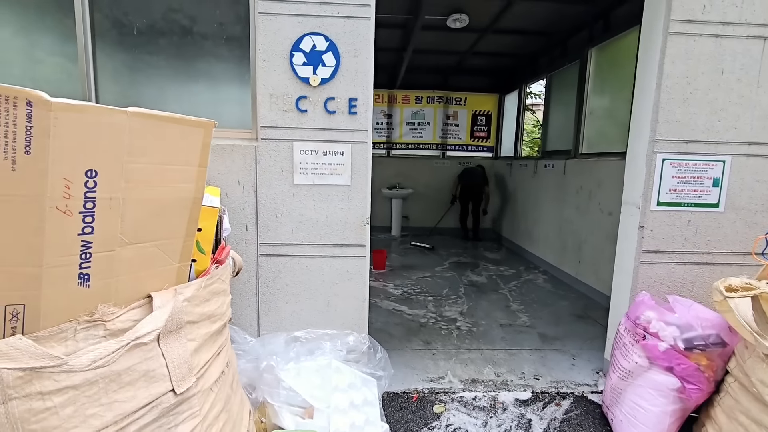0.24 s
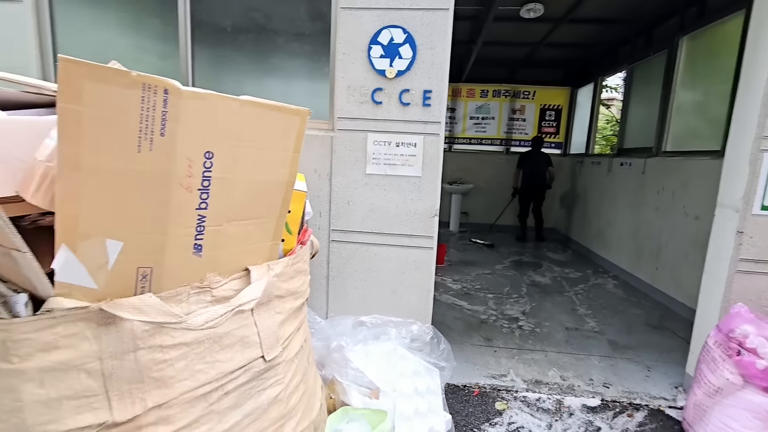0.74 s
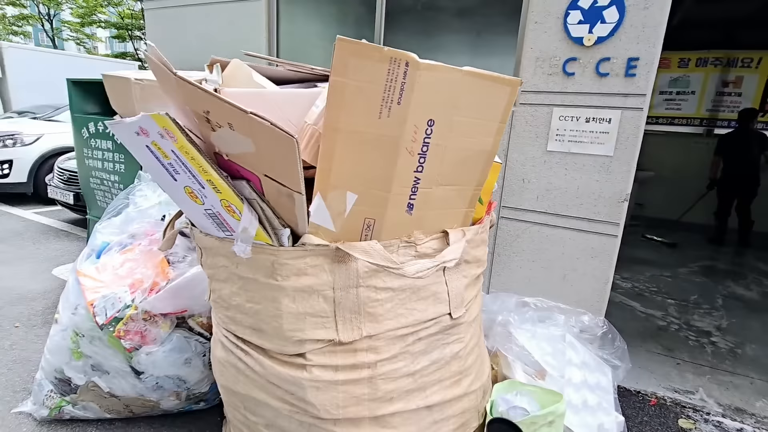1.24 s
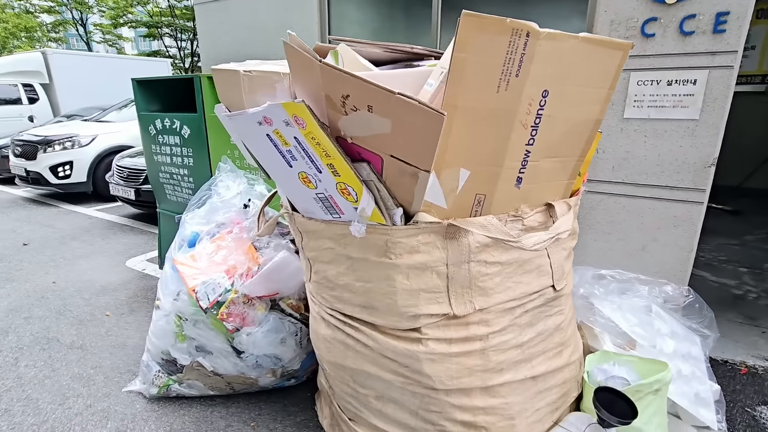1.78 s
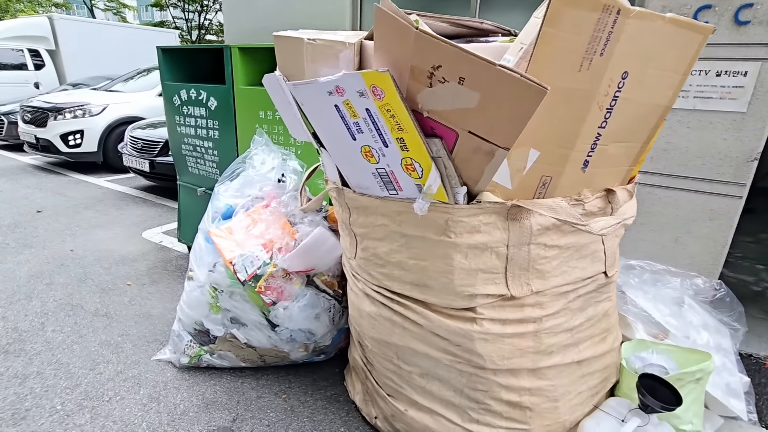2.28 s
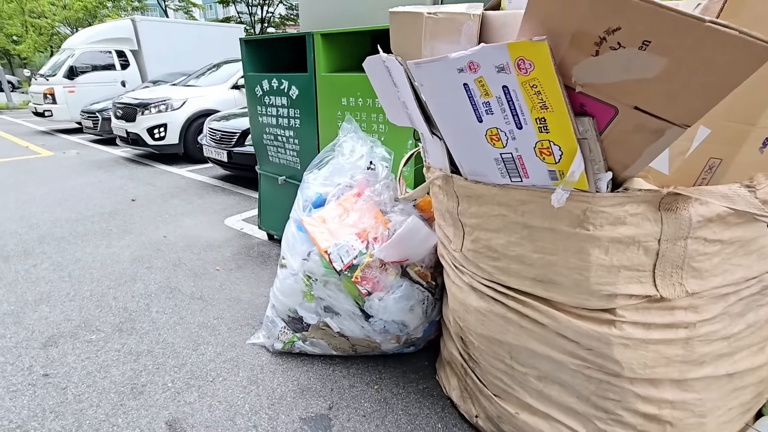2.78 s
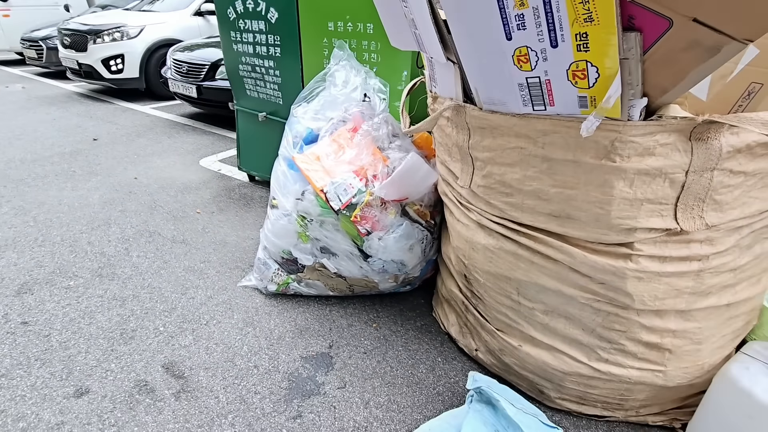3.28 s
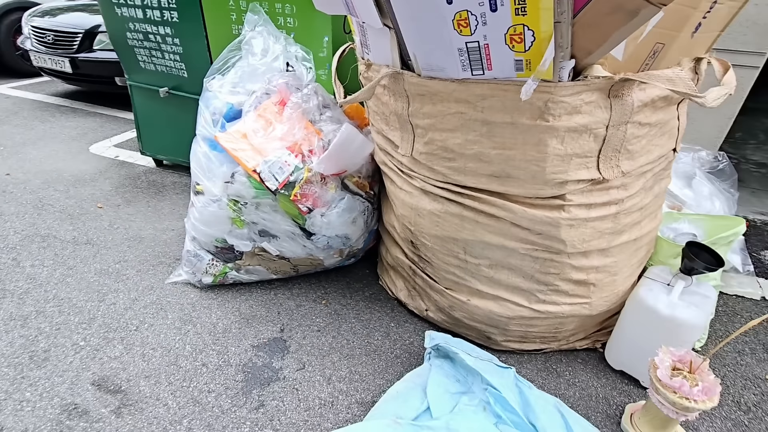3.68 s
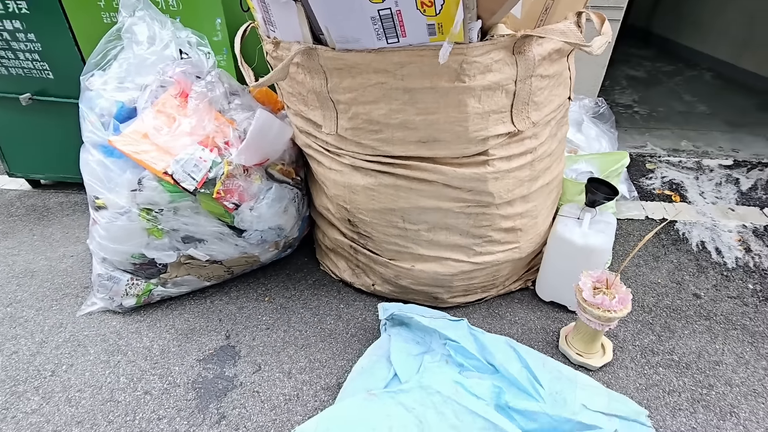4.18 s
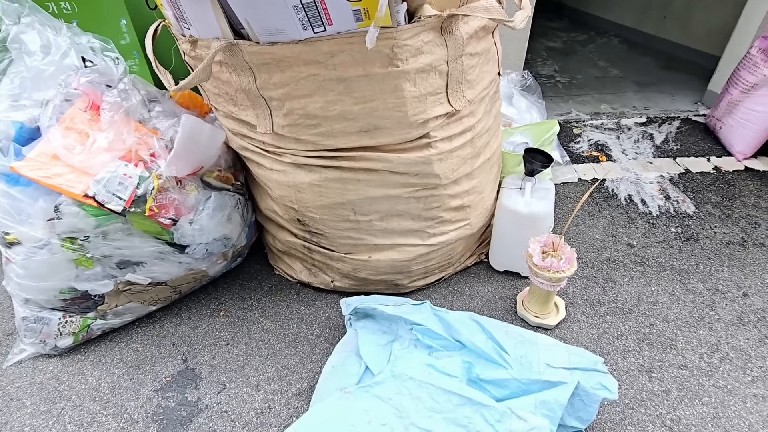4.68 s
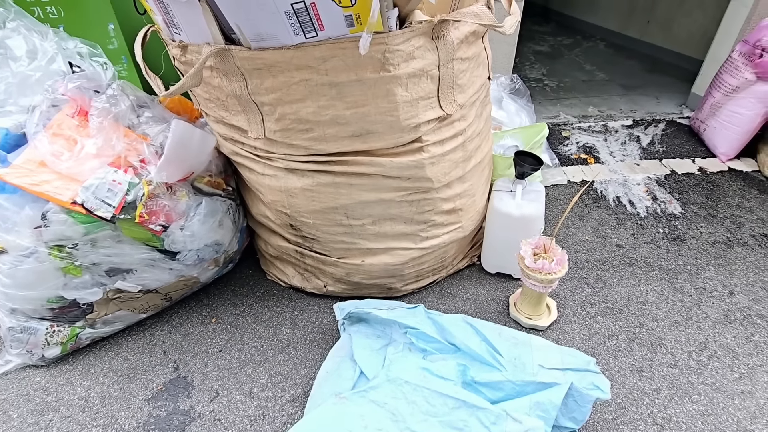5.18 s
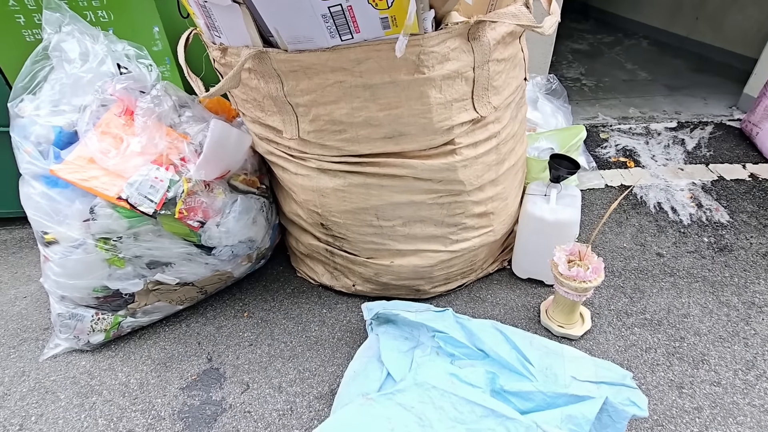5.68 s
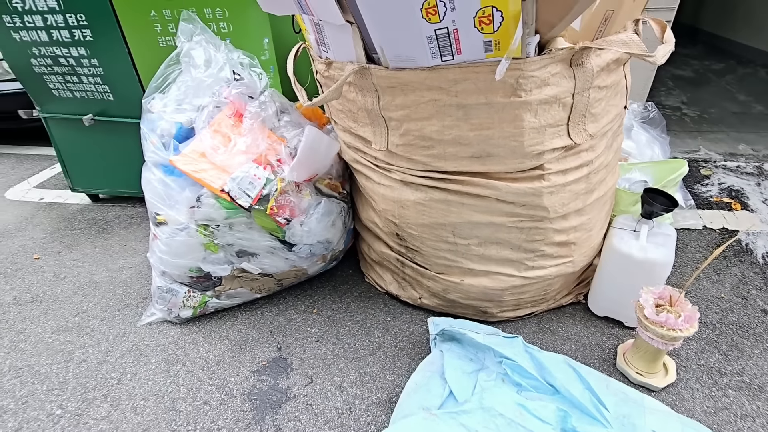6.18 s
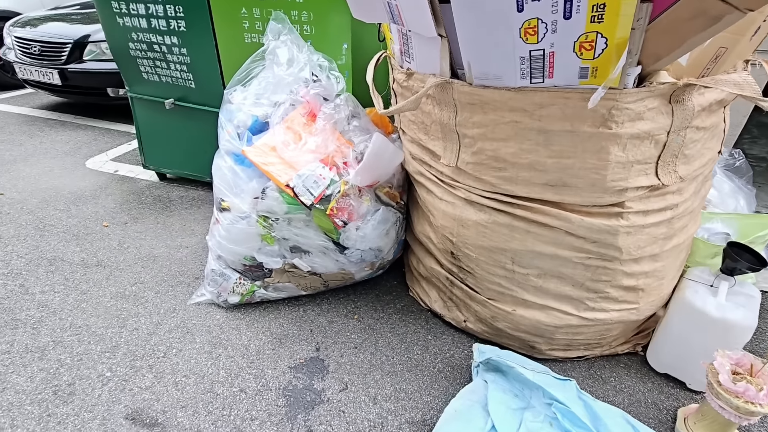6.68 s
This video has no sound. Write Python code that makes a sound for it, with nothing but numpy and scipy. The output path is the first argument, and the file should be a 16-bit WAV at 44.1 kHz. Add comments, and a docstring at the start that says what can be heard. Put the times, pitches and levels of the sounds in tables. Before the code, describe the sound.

A stiff brush scrubs wet concrete back and forth in an echoing shed, over distant traffic rumble and a ventilation drone.

```python
"""In a hard-walled shed a stiff brush scrubs wet concrete to and fro, while a clatter dies away.
Friction snaps the bristles free, thousands a second, as hiss and rasp; the walls add reverberation.
Outside, distant traffic and ventilation rumble over a car park as a diffuse field.
Someone holding the microphone shifts about, with a few soft scuffs and ticks and one low bump."""
import sys
import numpy as np
from scipy import signal
from scipy.fft import rfft, irfft, next_fast_len
from scipy.io import wavfile
from scipy.ndimage import uniform_filter1d, map_coordinates

SR = 44100
rng = np.random.default_rng(int(sys.argv[2]) if len(sys.argv) > 2 else 0)


def wav_record(signal):
    """Record a signal, one row per channel, as 16-bit PCM in the file named by sys.argv[1]."""
    frames = np.transpose(np.atleast_2d(signal))
    bounded = np.clip(frames, -1, 1)
    # unit amplitude maps onto the largest positive 16-bit level
    quanta = np.round(bounded * 32767).astype(np.int16)
    wavfile.write(sys.argv[1], SR, quanta)


N = 305965


def amp(db):
    """Amplitude grows tenfold for every 20 dB."""
    return 10 ** (np.asarray(db) / 20)


def unit(x):
    """Normalisation to rms 1."""
    return x / np.sqrt(np.mean(x ** 2) + 1e-20)


def along(points, hz):
    """Interpolation of (f/Hz, value) points on a logarithmic frequency axis."""
    f, values = np.transpose(points)
    return np.interp(np.log(hz + 1), np.log(f + 1), values)


def curves(rows):
    """Linear interpolation of (t/s, values...) rows: one envelope for each value column."""
    times, *columns = np.transpose(rows)
    return [np.interp(np.arange(N) / SR, times, column) for column in columns]


def wobble(rate):
    """Random modulation: a smooth curve through rate knots a second."""
    return map_coordinates(rng.standard_normal(int(N * rate / SR) + 4), [np.arange(N) * rate / SR])


def filtered(x, response):
    """Linear filtering: the spectrum is multiplied by a frequency response."""
    size = next_fast_len(N + SR // 2)
    return irfft(rfft(x, size) * response(np.fft.rfftfreq(size, 1 / SR)), size)[..., :N]


def add(track, start_s, sound):
    """Superposition: a sound adds to the track from start_s on."""
    part = track[..., max(round(start_s * SR), 0):][..., :sound.shape[-1]]
    part += sound[..., :part.shape[-1]]


def panned(db):
    """Intensity stereo: two gains for a left-minus-right level difference."""
    return amp(np.array([db, -db]) / 2)


def diffuse(pair, spectrum, left_lag_s=0.00036):
    """A diffuse field is less coherent between spaced microphones as frequency rises; rms 1."""
    # left-right likeness: f/Hz, coherence
    coherence = [(30, 0.86), (90, 0.98), (250, 0.85), (450, 0.66), (720, 0.31), (1400, 0.41), (2400, 0.28),
                 (3600, 0.072), (6000, 0.03)]
    angle = lambda hz: np.arccos(np.clip(along(coherence, hz), -1, 1)) / 2
    mid, side = filtered(pair, lambda hz: amp(along(spectrum, hz)) * [np.cos(angle(hz)), np.sin(angle(hz))])
    # most of the sound reaches the right side first
    delay = lambda hz: np.exp(np.outer([-1j, 1j], np.pi * hz * left_lag_s))
    return unit(filtered(np.array([mid + side, mid - side]), delay))


def stroke_levels(skew=0.91, hiss_power=1.424, rest_db=-75):
    """Friction noise follows a power of speed, one arch a stroke; gives hiss and rasp levels in dB."""
    # overlapping pushes and pulls: start t/s, length t/s, hiss level/dB, relative rasp level/dB
    strokes = [(-.012, .355, -51, -21), (.255, .335, -53.5, -9.5), (0.529, 0.36, -49, -13.5),
               (.802, 0.36, -50.5, -11.5), (1.096, .455, -48, -9.5), (1.464, 0.45, -48.5, -16),
               (1.857, 0.46, -45.5, -15), (2.23, 0.5, -47, -15), (2.673, .482, -44, -19),
               (3.067, .53, -46.5, -16), (3.53, .556, -43.5, -13.5), (3.995, 0.53, -43.5, -14.5),
               (4.442, 0.51, -43, -12), (4.861, 0.5, -44.2, -13.5), (5.308, 0.48, -42.5, -10),
               (5.695, 0.48, -47.5, -9), (5.96, 0.34, -58.5, -8), (6.22, 0.58, -67, -9),
               (6.768, 0.22, -57, -13)]
    t = np.arange(N) / SR
    hiss, rasp = np.full((2, N), amp(rest_db) ** 2)
    for start, length, hiss_db, rasp_db in strokes:
        progress = np.clip((t - start) / length, 0, 1)
        speed = np.abs(np.sin(np.pi * progress ** skew))  # fastest just before the middle
        power = (amp(hiss_db) * speed ** hiss_power) ** 2
        hiss += power
        rasp += power * amp(rasp_db) ** 2
    return 10 * np.log10(hiss), 10 * np.log10(rasp)


def flicks(per_second, spread_db=1.0):
    """Shot noise: bristle tips snap free at random moments and with uneven force."""
    snaps = rng.random((2, N)) < per_second / SR
    forces = rng.standard_normal((2, N)) * amp(spread_db * rng.standard_normal((2, N)))
    return unit(snaps * forces / np.sqrt(per_second))


def splay(pair, depth_db):
    """Spectral modulation: the bristles splay differently from moment to moment, so their colour wanders."""
    spectra = signal.stft(pair, nperseg=512)[2]
    patches = rng.standard_normal(spectra.shape[1:])
    patches = uniform_filter1d(patches, size=9, axis=0)  # across frequency
    patches = uniform_filter1d(patches, size=36, axis=1)  # across time
    return signal.istft(spectra * amp(depth_db * unit(patches)), nperseg=512)[1][:, :N]


def shed(x, wet_db):
    """Reverberation: the shed's hard walls give a smooth, diffuse echo; the treble dies first."""
    # reverberation time: f/Hz, 60 dB decay t/s
    t60 = [(300, 1.15), (3000, 0.82), (7000, 0.75), (15000, 0.13)]
    echo, hop = np.zeros((2, N)), SR // 4
    for start in range(0, N, hop):  # a fresh tail each quarter second keeps the echo free of tones
        hz, t, noise = signal.stft(rng.standard_normal((2, SR // 2)), SR, nperseg=256)
        tail = signal.istft(noise * amp(-60 * t / along(t60, hz)[:, None]), SR, nperseg=256)[1]
        tail /= np.linalg.norm(tail[0])
        add(echo, start / SR, signal.fftconvolve(x[:, start:start + hop], tail, axes=1))
    return x + amp(wet_db) * echo


def brush():
    """Stick-slip friction: faster strokes flick more bristles and spray; tufts catch on grit and rasp."""
    # spectra of bristles on wet concrete, fine spray and catching tufts: f/Hz, level/dB
    hiss_spectrum = [(1200, -17), (2700, -6), (3600, -2.5), (5300, 0.5), (7800, -0.5), (9200, -1),
                     (10300, -6.5), (11500, -8.5), (15300, -5)]
    spray_spectrum = [(1000, -90), (5000, -26), (9000, -4), (10300, -3), (11000, -7), (12000, -2),
                      (13200, -6), (15300, -2.5)]
    rasp_spectrum = [(400, -21), (900, -12), (1500, 0), (1900, -12.5), (2600, -8), (3150, 4), (4200, 3.5),
                     (6500, -6.5), (12000, -14)]
    # direction of the brush as the listener turns: t/s, left-minus-right level/dB
    bearing = [(0, 2.5), (1.3, -1.5), (2.9, -4), (4.4, -1), (6.94, -1.5)]
    pan_db, = curves(bearing)
    hiss_db, rasp_db = stroke_levels()
    activity_db = (hiss_db - hiss_db.max()) / 2
    activity, catch = amp(activity_db), wobble(70)
    hiss = amp(hiss_db + 0.37 * catch) * diffuse(flicks(24000 * activity), hiss_spectrum)
    spray_db = hiss_db + 1 + 0.12 * activity_db + 0.26 * catch
    spray = amp(spray_db) * diffuse(flicks(24000 * activity), spray_spectrum)
    rasp = amp(rasp_db + 3 + 1.3 * catch) * diffuse(flicks(3000 * activity), rasp_spectrum)
    direct = (hiss + spray) * panned(pan_db) + rasp
    return shed(splay(direct, depth_db=0.9), wet_db=-6)


def clatter(t60):
    """Resonance: hard knocks ring on between the walls and decay exponentially."""
    # knocks deep in the shed, heard as their echo: t/s, level/dB, rise t/s
    knocks = [(0, -42, 0.00046), (.57, -49.5, 0.034)]
    # their resonances: centre f/Hz, width f/Hz, level/dB
    modes = [(678, 42, 4), (900, 290, -3.5), (1320, 210, -1.5), (1580, 270, -3.5), (2220, 310, -7.5),
             (2960, 210, -6), (3420, 340, -8.5), (4770, 3100, -16.5)]
    t, envelope = np.arange(N) / SR, np.zeros(N)
    for start, db, rise in knocks:
        add(envelope, start, amp(db - 60 * t / t60) * (1 - np.exp(-t / rise)))
    body = lambda f: sum((-1) ** k * amp(db) * 1j * f * width / (hz * hz - f * f + 1j * f * width)
                         for k, (hz, width, db) in enumerate(modes))
    return envelope * unit(filtered(rng.standard_normal((2, N)), body))


def rush(spectrum):
    """Many incoherent sources sum to diffuse Gaussian noise; rms 1."""
    return diffuse(rng.standard_normal((2, N)), spectrum)


def town():
    """Diffuse background noise: traffic rumble, a hollow ventilation drone and a haze of far tyres."""
    # spectra of traffic, ventilation and tyres: f/Hz, level/dB
    rumble_spectrum = [(12, -32), (25, -7), (42, -3), (80, -1), (150, 0), (200, -2), (320, -28.5),
                       (700, -64), (2000, -120)]
    drone_spectrum = [(20, -60), (90, -42), (160, -7), (185, -0.5), (208, 0), (235, -0.5), (275, -4.5),
                      (330, -16.5), (500, -33), (1500, -120)]
    haze_spectrum = [(30, -47), (150, -23.5), (280, -1), (380, 0.5), (500, -7), (700, -13), (1000, -19.5),
                     (1500, -22.5), (2200, -26), (4500, -32.5), (9600, -36.5), (10700, -40), (15000, -45)]
    # the traffic slowly grows: t/s, relative rumble level/dB, relative haze level/dB
    traffic = [(0, -48, -49.5), (1.6, -47.5, -46.5), (2.7, -47, -47.5), (3.6, -42.5, -46.5),
               (4.9, -47.5, -47.5), (5.5, -46.5, -45), (6.2, -43.8, -47.5), (6.94, -43, -49)]
    # the drone swells and sinks: t/s, level/dB
    ventilation = [(0, -43.5), (.8, -43), (1.65, -36), (2.1, -40), (2.6, -40.5), (3.35, -37), (4.1, -37.5),
                   (5.0, -42), (5.4, -36), (5.85, -42.5), (6.25, -38.5), (6.94, -38.5)]
    rumble_db, haze_db = curves(traffic)
    drone_db, = curves(ventilation)
    rumble = amp(rumble_db + 3 + 0.55 * wobble(5)) * rush(rumble_spectrum)
    drone = amp(drone_db + 0.97 * wobble(8)) * rush(drone_spectrum)
    haze = amp(haze_db + 3 + 0.63 * wobble(10)) * rush(haze_spectrum)
    return rumble + drone + haze


def scuffs(t60, drag_db, drag_t60, attack_s):
    """Impact, then sliding friction: grit ticks under a sole and a weaker drag follows."""
    # shoes on asphalt: t/s, level/dB, pitch of the noise band f/Hz
    steps = [(1.44, -38, 700), (3.986, -44, 1300), (4.011, -41, 1150), (4.164, -35, 840),
             (4.204, -36, 1100), (4.229, -39, 900), (6.126, -37, 1300), (6.582, -50.5, 3000),
             (6.828, -42.5, 2300)]
    out, t = np.zeros((2, N)), np.arange(SR // 5) / SR
    tick, drag = amp(-60 * t / t60), amp(drag_db - 60 * t / drag_t60)
    envelope = (tick + drag) * (1 - np.exp(-t / attack_s))
    for start, db, hz in steps:
        band = signal.butter(2, [hz * 0.33, min(hz * 1.16, SR / 3)], "bandpass", fs=SR)
        grit = unit(signal.lfilter(*band, rng.standard_normal((2, len(t)))))
        add(out, start, amp(db) * envelope * grit)
    return out


def bump(t60, attack_s):
    """Damped oscillation: a jolt of the hand gives a few slow pressure swings, mostly on the right."""
    # jolt of the microphone: t/s, level/dB, f/Hz, left-minus-right level/dB
    jolts = [(3.108, -27, 54.7, -12.5)]
    out, t = np.zeros((2, N)), np.arange(SR // 3) / SR
    for start, db, hz, pan_db in jolts:
        swing = amp(db - 60 * t / t60) * (1 - np.exp(-t / attack_s)) * np.cos(2 * np.pi * hz * t)
        add(out, start, panned(pan_db)[:, None] * swing)
    return out


def scene():
    """Superposition of the shed, the town round it and the small sounds close by."""
    near = scuffs(t60=0.011, drag_db=-11.5, drag_t60=0.17, attack_s=0.00036)
    near += bump(t60=0.16, attack_s=0.0017)
    return brush() + clatter(t60=1.53) + town() + near


def record(dry, top_hz=15520):
    """Frequency response: the two microphones differ in the treble and pass nothing above top_hz."""
    # treble imbalance: f/Hz, left-minus-right level/dB
    imbalance = [(3000, 0), (9500, 2), (10500, -1.5), (12000, -5), (13500, -6.5), (15300, -1.5)]
    return filtered(dry, lambda hz: panned(along(imbalance, hz)) * (hz < top_hz))


dry = scene()
out = record(dry)
wav_record(out)
```